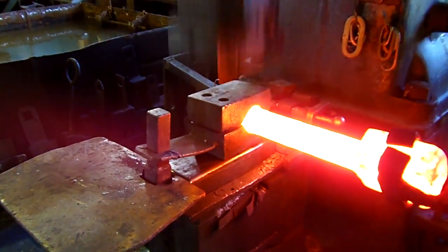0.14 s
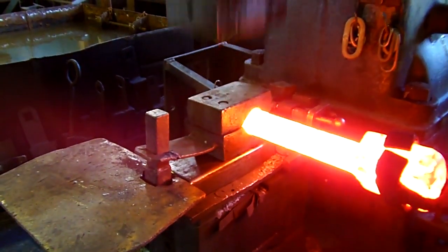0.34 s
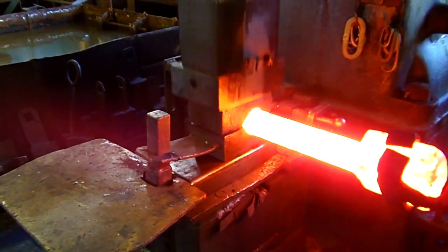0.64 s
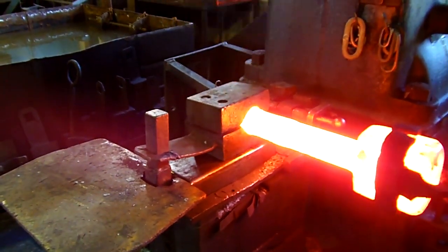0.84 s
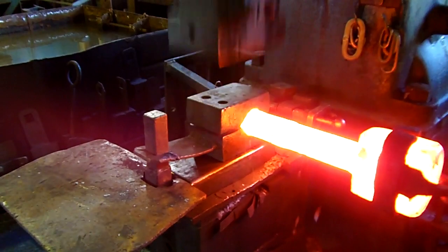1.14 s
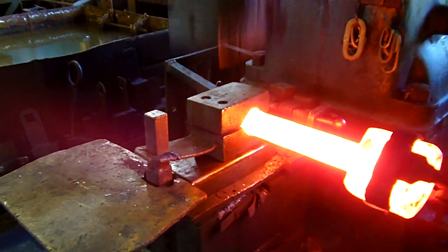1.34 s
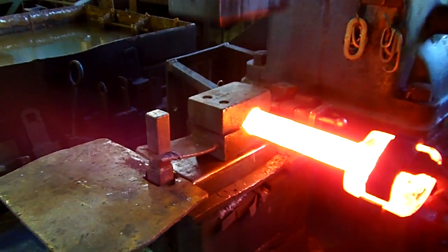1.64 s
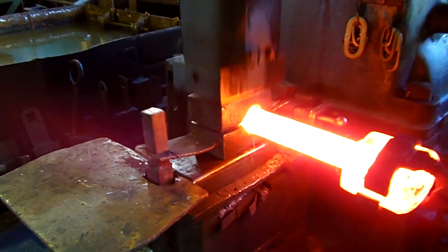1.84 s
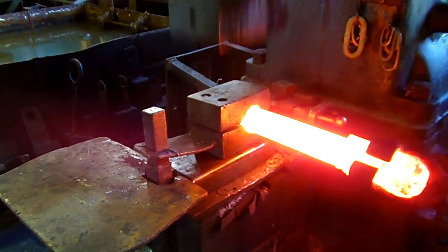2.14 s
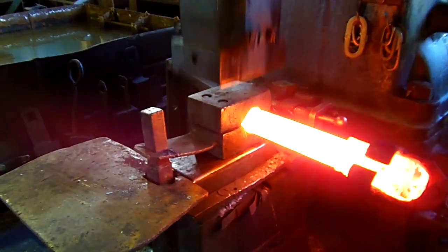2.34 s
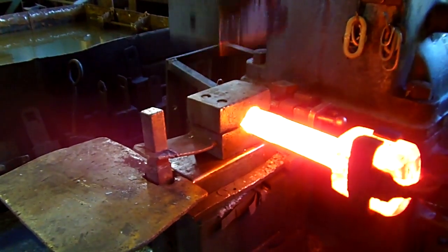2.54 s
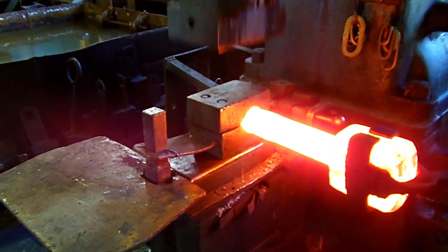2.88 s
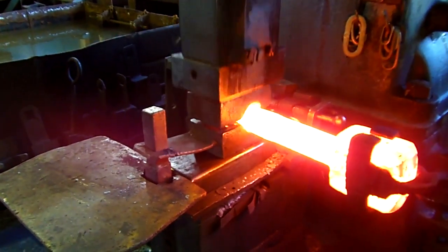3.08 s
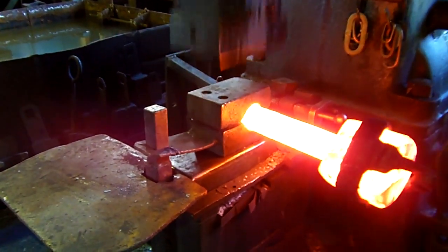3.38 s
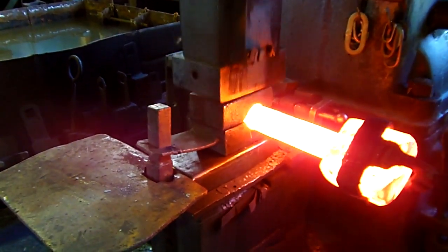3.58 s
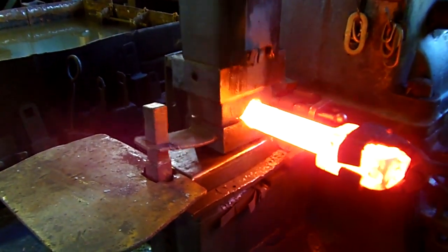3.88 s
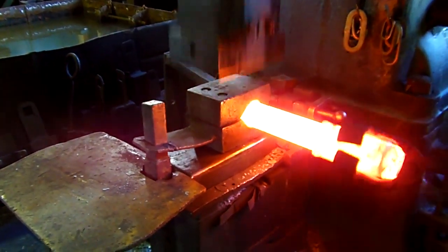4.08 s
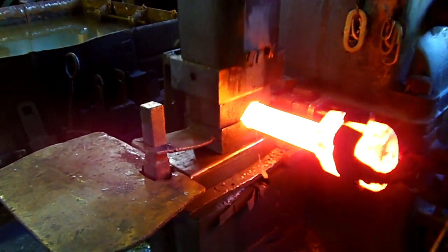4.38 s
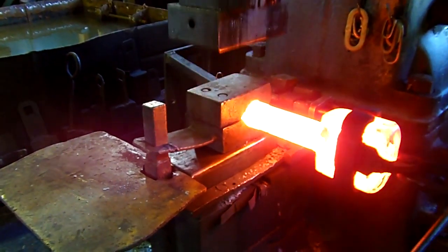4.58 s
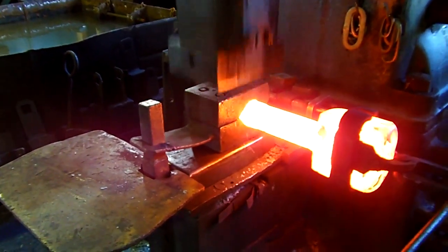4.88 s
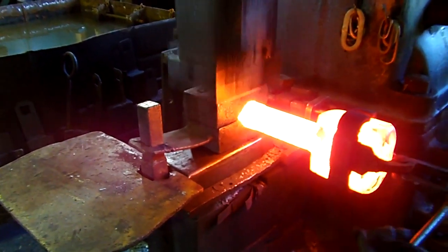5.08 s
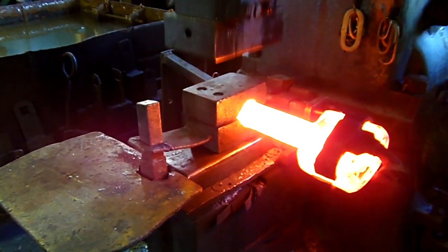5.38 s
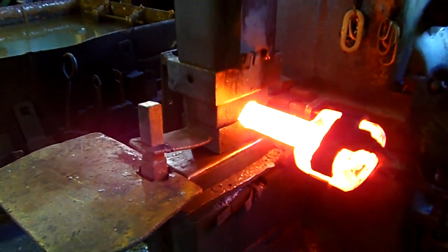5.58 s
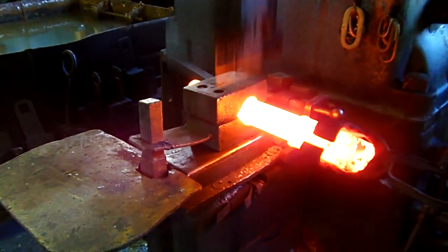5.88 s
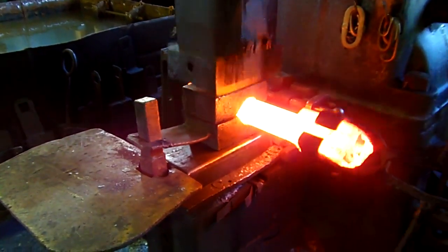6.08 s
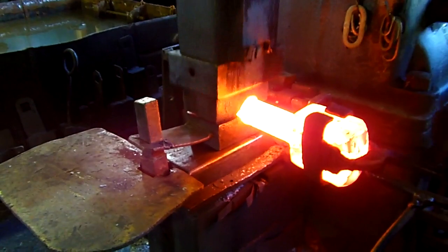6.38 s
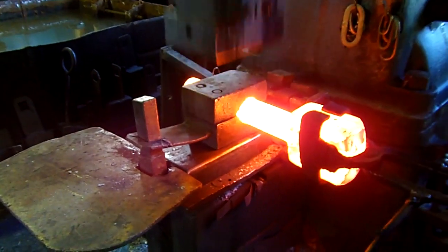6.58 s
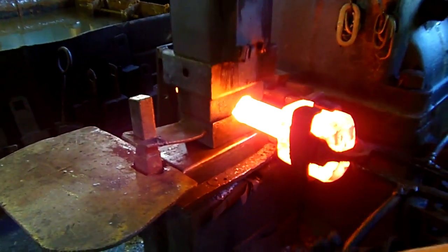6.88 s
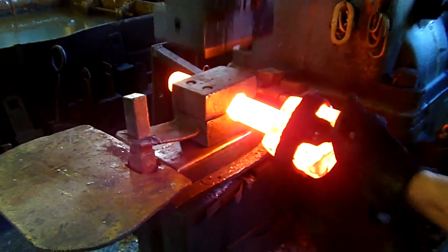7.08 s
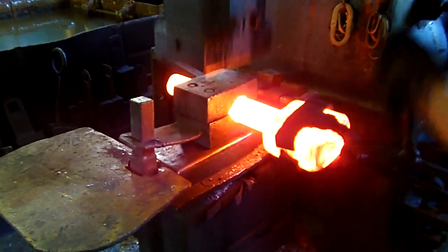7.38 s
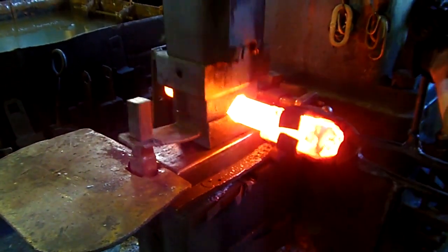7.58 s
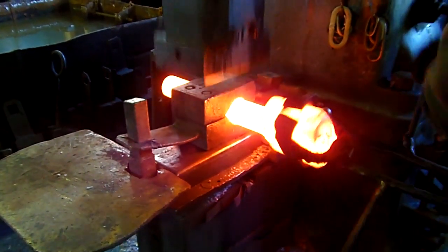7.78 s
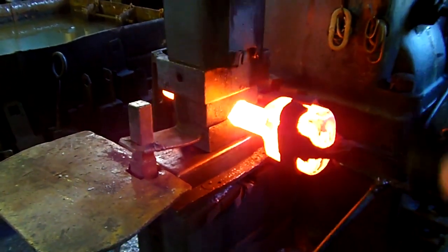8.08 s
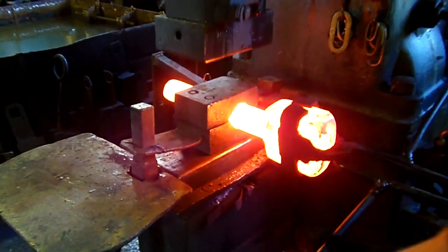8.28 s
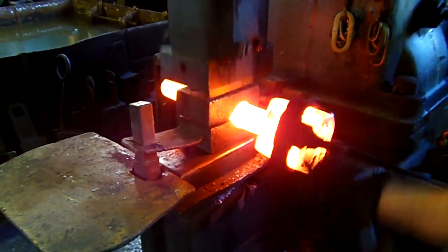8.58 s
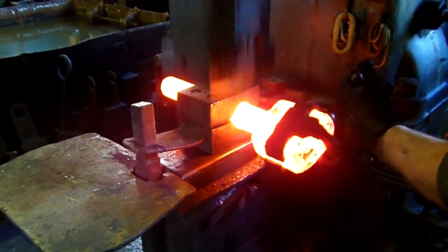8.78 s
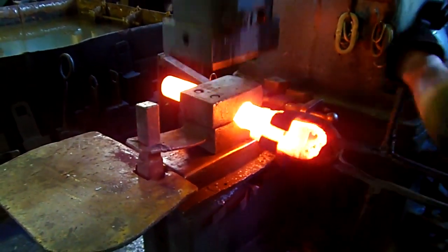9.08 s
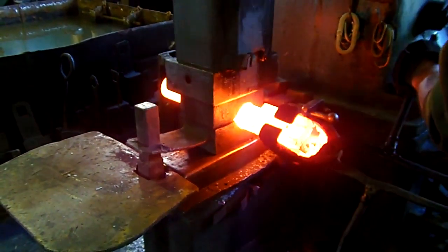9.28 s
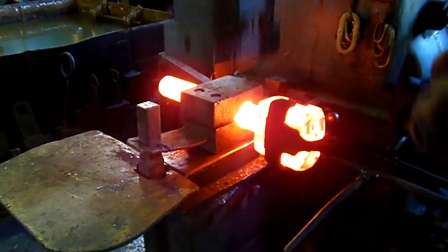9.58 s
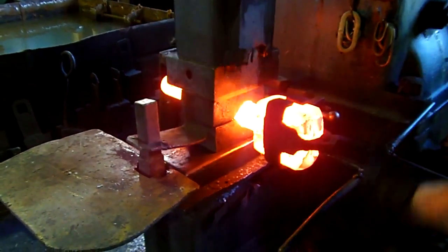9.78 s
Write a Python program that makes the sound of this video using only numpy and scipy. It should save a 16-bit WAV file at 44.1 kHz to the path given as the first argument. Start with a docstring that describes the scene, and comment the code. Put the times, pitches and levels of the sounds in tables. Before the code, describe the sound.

A power hammer pounds a hot steel bar in a steady rhythm, sharp metallic cracks over low thumps, machine rumble and hissing air in a forge hall.

```python
"""A power hammer strikes a hot bar about every 0.4 s in a large forge hall, over a rumbling machine and leaking air.
Bright valve ticks come once a turn, and puffs of vented air precede some of the blows.
Each blow brings a low thump, a crack of noise and a shuddering frame; damped steel modes ring, then the hall rolls.
Every few blows blow tails, rumble and air swell together to a top, ease, sag and drop back to rest.
The loudest sounds are held by a limiter; knocks, clinks and bounces of loose metal fall in between."""
import sys
import numpy as np
from scipy import signal
from scipy.fft import rfft, irfft
from scipy.io import wavfile
from scipy.ndimage import uniform_filter1d, minimum_filter1d

SR = 44100
rng = np.random.default_rng(int(sys.argv[2]) if len(sys.argv) > 2 else 0)


def int16_out(signal):
    """Quantize to a 16-bit WAV file."""
    q = np.round(np.clip(np.atleast_2d(signal).T, -1, 1) * 32767)
    wavfile.write(sys.argv[1], SR, q.astype(np.int16))


N = 438354

# hammer blows; treble, clang and high ring tilt the colour, thump is the level of the low thump:
# start_s, level_db, treble_db, clang_db, high_ring_db, thump_db
BLOWS = [(0.294, 8.5, -2, -6, -8, -41), (0.741, -2, -6, 0.5, -2.5, -39), (1.096, -9.5, -2, -5, -10, -28),
         (1.507, -13.5, -4.5, 3.5, -2.5, -27.5), (1.915, -11, -4.5, -2, -4.5, -21),
         (2.326, -13.5, -7.5, -4.5, -12.5, -38), (2.729, 3.5, -1.5, -11, -3.5, -25),
         (3.133, -5.5, 0.5, -2, 1, -21.5), (3.539, -13.5, -2, 0, -2.5, -21),
         (3.949, -10.5, -9, 7, -1.5, -23), (4.359, -11.5, -3, 0.5, -9, -16), (4.775, 3, -3, -3, -25, -20.5),
         (5.186, -3, -3.5, -7, -8, -27), (5.596, -13, -4.5, -2.5, -5, -38.5),
         (6.011, -10.5, -6, -11.5, -8, -46.5), (6.427, -13.5, -2, 9, -8.5, -24.5),
         (6.841, 4, 1.5, -3, -11, -24), (7.25, -3.5, -2.5, -1, -9.5, -18), (7.665, -11.5, -4, -4, -6, -20),
         (8.075, -15.5, -8, 1.5, -18, -36), (8.493, 4.5, 0, -7, 0, -38), (8.899, -7.5, -2, -11, 0, -26.5),
         (9.312, -12, -2, -8, -6, -19.5), (9.728, -14, -5, 0, -6, -31)]

# third-octave band edges in Hz, and a band-pass filter for each band
EDGES_HZ = 16 * 2 ** np.arange(0, 10.2, 1 / 3)
BANK = [signal.butter(2, edges, "band", fs=SR, output="sos") for edges in zip(EDGES_HZ, EDGES_HZ[1:])]


def amp(db):
    """Decibels are logarithmic: the amplitude gain is ten to the power db / 20."""
    return np.exp(np.asarray(db) * (np.log(10) / 20))


def in_time(rows):
    """Linear interpolation: (time_s, value) rows become a curve at every sample."""
    return np.interp(np.arange(N) / SR, *np.transpose(rows))


def at_hz(points, hz):
    """Logarithmic frequency scale: (hz, value) points are joined by lines over log frequency."""
    points = np.array(points)
    return np.interp(np.log(hz), np.log(points[:, 0]), points[:, 1])


def coloured(spectrum):
    """Spectral shaping: white noise weighted in frequency becomes steady noise of rms 1."""
    hz = np.maximum(np.fft.rfftfreq(N, 1 / SR), 1)
    white = rfft(rng.standard_normal(N))
    noise = irfft(white * amp(at_hz(spectrum, hz)) * (hz > 12), N)
    return noise / noise.std()


def dying_noise(size, spectrum, t60s, rise_s, slow=None):
    """Frequency-dependent decay: each noise band dies at its own rate; slow = (dB, t60) adds a second slope."""
    t, out = np.arange(size) / SR, 0
    white = rng.standard_normal((2, size))  # neighbouring bands take different noise
    for k, hz in enumerate(np.sqrt(EDGES_HZ[1:] * EDGES_HZ[:-1])):
        fall = amp(-60 * t / at_hz(t60s, hz))
        if slow:
            slow_db, slow_t60s = slow
            fall = fall + amp(at_hz(slow_db, hz) - 60 * t / at_hz(slow_t60s, hz))
        band = signal.sosfilt(BANK[k], white[k % 2])
        out = out + band * amp(at_hz(spectrum, hz)) * fall
    return out * (1 - np.exp(-t / rise_s))


def ring(clicks, hz, t60):
    """Damped resonance: a two-pole filter answers a unit click with a dying sine of initial height 1."""
    radius, angle = amp(-60 / (t60 * SR)), 2 * np.pi * hz / SR
    poles = [1, -2 * radius * np.cos(angle), radius * radius]
    return signal.lfilter([0, np.sin(angle)], poles, clicks + 1e-18)


def wobble(size, per_s):
    """Slow random modulation: normal random points of spread 1, joined by straight lines."""
    at = np.arange(size) * per_s / SR
    count = int(at[-1]) + 2
    return np.interp(at, np.arange(count), rng.standard_normal(count))


def add(out, s, sound):
    """Superposition: a sound is summed into the mix from time s."""
    at = round(s * SR)
    out[at:at + len(sound)] += sound[:N - at]


def blows(loudness_db):
    """Impact and reverberation: cracks and ringing steel excite the hall, whose noise tail is convolved on."""
    cracks = crack_noise(loudness_db)
    rings = steel(blow_strikes() + bounce_strikes() + valve_ticks(loudness_db), loudness_db)
    to_hall = cracks + amp(-9) * rings
    return cracks + rings + amp(-21) * signal.fftconvolve(to_hall, hall_tail())[:N]


def crack_noise(loudness_db):
    """Broadband impact: a blow excites a short crack and the slower shudder of the frame."""
    # relative spectrum of the crack: hz, level_db (per Hz)
    crack = [(18, -29), (30, 10), (132, -5), (593, -14.5), (1180, -12.5), (1620, -5.5), (2000, -7),
             (2600, -3), (3570, -9), (3970, 2.5), (4410, -8), (5590, -9.5), (6550, -17), (7600, -16),
             (9000, -12.5), (15200, -8), (16500, -32)]
    # decay of the crack: hz, t60_s
    crack_t60 = [(60, 0.084), (300, 0.074), (1000, 0.032), (3000, 0.029), (8000, 0.097), (15000, 0.035)]
    # shudder of the frame, relative to the crack: hz, level_db
    frame = [(60, -6), (300, -8.5), (1000, -2), (3000, -14.5), (8000, -16), (15000, -21.5)]
    # decay of the shudder: hz, t60_s
    frame_t60 = [(60, 0.18), (300, 0.32), (1000, 0.22), (3000, 0.27), (8000, 0.39), (15000, 0.25)]
    bass_db, shudder_db = 5.5, 2  # alike for every blow
    shudder = [(hz, db + shudder_db) for hz, db in frame], frame_t60
    out = np.zeros(N)
    for s, db, treble_db, *_ in BLOWS:
        tilt = [(200, bass_db), (900, 0), (4000, 0), (10000, treble_db)]
        tilted = [(hz, level + at_hz(tilt, hz)) for hz, level in crack]
        hit = dying_noise(SR // 3, tilted, crack_t60, rise_s=0.00049, slow=shudder)
        hit = hit * amp(2 * wobble(len(hit), per_s=300))  # loose parts clatter unevenly
        # the shared loudness, applied later, is divided out at the onset
        add(out, s, amp(db - loudness_db[round(s * SR)] + 7.5) * hit)
    return out


def steel(strikes, loudness_db):
    """Modal excitation: each strike sets all modes ringing in a new mix; weaker contacts after it roughen the ring."""
    # modes of ram, dies and anvil: hz, level_db, t60_s
    modes = [(690, -16, .13), (866, -12, .12), (1523, -6, .1), (1752, -13, .13), (2153, -14, .14),
             (2265, -21, .25), (2325, -17, .13), (2953, -13, .11), (3332, -17, .22), (3736, -16, .3),
             (3893, 3, .12), (3965, -8, .14), (4177, -13, .11), (4675, -11, .12), (4785, -10, .13),
             (4871, -10, .1), (5575, -16, .1), (5984, -11, .15), (6546, -16, .12), (6756, -24, .4),
             (6852, -20, .5), (7146, -29, .45), (7370, -15, .07), (7680, -11, .05), (8484, -21, .12),
             (9116, -21, .35), (9504, -16, .17), (10187, -21, .22), (10662, -19, .18), (11232, -20, .55),
             (11414, -25, .5), (12082, -18, .26), (13890, -26, .45), (13985, -28, .5), (15488, -25, .45)]
    clicks, modes_hz = np.zeros((len(modes), N)), np.array(modes)[:, 0]
    mix_db = rng.normal(0, 3, (len(strikes), len(modes)))
    chance = rng.random((len(strikes), 3, len(modes), 4))  # four later contacts for each mode
    for (s, db, *groups_db), mode_db, (late, size, sign) in zip(strikes, mix_db, chance):
        low_db, clang_db, high_db = np.minimum(groups_db, 5)
        lean_db = np.interp(modes_hz, [2500, 3600, 5000, 6500], [low_db, clang_db, clang_db, high_db])
        onset = round(s * SR)
        gain = amp(db - loudness_db[onset] + lean_db + mode_db - 14.5)
        clicks[:, onset] += gain
        at = np.minimum(((s + .05 * late ** 2) * SR).astype(int), N - 1)  # within 50 ms, mostly early
        weaker = gain[:, None] * amp(-6 - 14 * size - 14 * late ** 2) * np.sign(sign - .5)
        np.add.at(clicks, (np.arange(len(modes))[:, None], at), weaker)
    return sum(amp(db) * ring(row, hz, t60) for row, (hz, db, t60) in zip(clicks, modes))


def blow_strikes():
    """Modal weighting: each blow leans on the low, clang and high modes by its own levels."""
    low_ring_db = 3.5  # alike for every blow
    return [(s, db, low_ring_db, clang_db, high_db) for s, db, _, clang_db, high_db, _ in BLOWS]


def bounce_strikes():
    """Rebound: ram or bar bounces on the die and strikes the steel modes again."""
    # bounces: start_s, level_db, clang_db
    bounces = [(.312, -6.5, 3), (2.745, -4.5, 5), (4.784, -8.5, 7), (5.285, -25, 4), (5.68, -27, -2),
               (6.09, -23, -6), (6.854, 1, -15), (6.877, -12, 16), (6.914, -11.5, 5), (8.503, -2.5, -8),
               (8.52, -3.5, -4), (8.985, -22, -9), (9.81, -28, 1)]
    low_db, high_db = 4, -9
    return [(s, db, low_db, clang_db, high_db) for s, db, clang_db in bounces]


def valve_ticks(loudness_db):
    """Periodic impact: the valve gear ticks once a turn, leaning on the high steel modes."""
    first_s, turn_s = .1003, .4142
    tick_db, first_extra_db = 4, 8.5  # over the shared loudness; the first stands out more
    low_db, clang_db, high_db = -28, -28, 0
    ticks = []
    for s in np.arange(first_s, N / SR, turn_s):
        level_db = loudness_db[round(s * SR)] + tick_db + first_extra_db * (s == first_s)
        ticks.append((s, level_db, low_db, clang_db, high_db))
    return ticks


def hall_tail():
    """Diffuse reverberation: the hall's impulse response is noise with a decay time for each band."""
    # relative spectrum of the tail: hz, level_db
    hall = [(60, -23), (300, -18), (1000, -18.5), (3000, -20.5), (8000, -15.5), (15000, -63.5)]
    # decay of the hall: hz, t60_s
    hall_t60 = [(60, 1.5), (300, 1.08), (1000, 0.6), (3000, 0.74), (8000, 0.18), (15000, 1.8)]
    return dying_noise(SR * 2, hall, hall_t60, rise_s=0.063)


def thumps():
    """Low-frequency pulse: a low thump at each blow is a short dip, then a long shallow rebound."""
    out, t = np.zeros(N), np.arange(SR // 6) / SR
    dip = np.exp(-.5 * ((t - .009) / .005) ** 2)
    rebound = np.abs(np.sin(np.pi * np.clip((t - .02) / .085, 0, 1))) ** .5
    for s, *_, thump_db in BLOWS:
        add(out, s, amp(thump_db) * (.25 * rebound - dip))
    return out


def knocks():
    """Heavily damped impact: bar and tongs knock on the die as short puffs of noise around a centre."""
    # knocks: start_s, peak_db, centre_hz, t60_s
    knock_rows = [(3.761, -44, 980, 0.096), (7.952, -35.5, 995, 0.1), (8.168, -31, 2520, 0.039),
                  (8.436, -16, 1000, 0.13), (8.984, -25, 3040, 0.035)]
    out = np.zeros(N)
    for s, db, hz, t60 in knock_rows:
        shape = [(hz / 8, -14), (hz, 0), (hz * 1.2, -6), (hz * 4, -30), (hz * 12, -60)]
        puff = dying_noise(SR // 4, shape, [(100, t60 * 1.2), (10000, t60)], rise_s=0.0012)
        add(out, s, amp(db) * puff / np.abs(puff).max())
    return out


def clinks():
    """Single-mode resonance: loose parts each ring on one dying note."""
    # clinks: start_s, pitch_hz, level_db, t60_s
    clink_rows = [(.001, 3335, -33.5, 0.41), (3.6, 4300, -41, .3), (.045, 690, -33, 0.072),
                  (7.955, 710, -40.5, 0.17), (8.11, 745, -39.5, 0.3), (8.17, 730, -38, 0.23),
                  (7.668, 5100, -21, 0.1), (8.44, 2400, -39, 0.42), (8.57, 3330, -30, 0.19)]
    out = np.zeros(N)
    for s, hz, db, t60 in clink_rows:
        add(out, s, amp(db) * ring(signal.unit_impulse(SR // 4 * 2), hz, t60))
    return out


def rumble():
    """Amplitude-modulated noise: the machine's mostly low noise is slightly lumpy in level."""
    # relative spectrum of the rumble: hz, level_db (per Hz)
    spectrum = [(11, -27), (18, -2), (30, -6.5), (58, -4), (110, -25), (170, -16.5), (235, -16),
                (430, -25.5), (570, -34), (720, -25), (2370, -39), (6430, -44), (7860, -62), (15100, -53),
                (16500, -61)]
    lumps = amp(1.5 * wobble(N, per_s=14))
    return amp(4) * lumps * coloured(spectrum)


def air():
    """Flow noise: escaping air hisses in a steady leak and a few rounded puffs."""
    # relative spectrum of the hiss: hz, level_db (per Hz)
    colour = [(410, -50.5), (700, -22.5), (1070, -12.5), (1590, -23.5), (2560, 9), (4120, 2), (6370, -4.5),
              (7770, -11.5), (15000, -12), (15900, -29.5), (16500, -58.5)]
    # puffs, level over the shared loudness: top_s, level_db
    puff_rows = [(0.212, 4), (.62, -6.5), (2.7, -16), (4.75, -17), (6.82, -16.5), (8.42, -17)]
    leak_db = -23  # over the shared loudness
    puff_s = .05  # a puff's own curve is 6 dB down this far from its top
    t = np.arange(N) / SR
    puffs = sum(amp(np.maximum(db - 6 * ((t - s) / puff_s) ** 2, -99)) for s, db in puff_rows)
    return (amp(leak_db) + puffs) * coloured(colour)


def loudness():
    """Level envelope in dB: rest, a climb and jump to each top, a quick easing, a sag, a drop after the next blow."""
    # swells of the shared loudness; the last is still climbing at the end: start_s, top_s, top_db
    swells = [(-.5, .29, -29), (2.39, 2.737, -32), (4.54, 4.783, -31), (6.567, 6.85, -35),
              (8.043, 8.491, -33), (9.71, 10.2, -43.5)]
    rest_db, jump_db = -52, 3.5  # the jump is the last 10 ms of the climb
    ease_db, ease_s = 8, 0.083
    sag_db_per_s, drop_s = 15.5, 0.092
    blows_s, rows = np.array([b[0] for b in BLOWS] + [99]), []  # 99 s stands for no further blow
    for start_s, top_s, top_db in swells:
        next_s = blows_s[blows_s > top_s + .1][0]
        eased_s, eased_db = top_s + ease_s, top_db - ease_db
        rows += [(start_s, rest_db), (top_s - .01, top_db - jump_db), (top_s, top_db), (eased_s, eased_db),
                 (next_s, eased_db - sag_db_per_s * (next_s - eased_s)), (next_s + drop_s, rest_db)]
    return in_time(rows)


def scene():
    """Common modulation: blows, rumble and air share one loudness; thumps and small metal keep their own levels."""
    loudness_db = loudness()
    machine = blows(loudness_db) + rumble() + air()
    return (amp(loudness_db) * machine + thumps() + knocks() + clinks())[None]


def record(dry):
    """Filtering and compression: a narrow dip near 7.8 kHz, a fast limiter, rounded peaks, a low-pass cut."""
    dip_hz, dip_width_hz, dip_db = 7830, 220, -14
    limit, overload, cutoff_hz = 1.2, .8, 17100  # limit and overload are amplitudes
    resonance = signal.lfilter(*signal.iirpeak(dip_hz, dip_hz / dip_width_hz, SR), dry)
    dipped = dry - (1 - amp(dip_db)) * resonance
    peak = -minimum_filter1d(-np.abs(dipped), size=61)  # running maximum
    gain = uniform_filter1d((1 + (peak / limit) ** 4) ** -.25, size=41)
    rounded = overload * np.tanh(gain * dipped / overload)
    return signal.sosfilt(signal.cheby2(14, 80, cutoff_hz, fs=SR, output="sos"), rounded)


dry = scene()
out = record(dry)
int16_out(out)
```